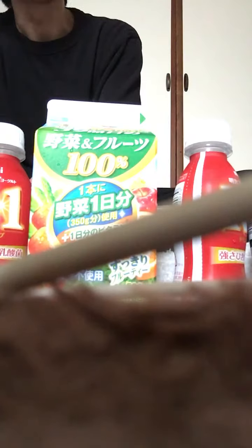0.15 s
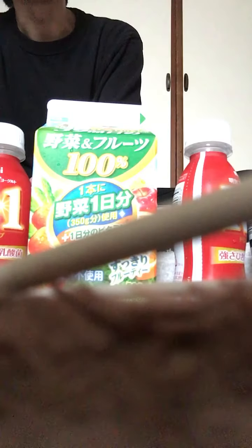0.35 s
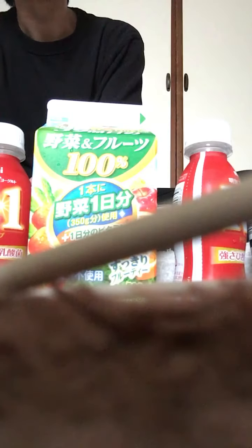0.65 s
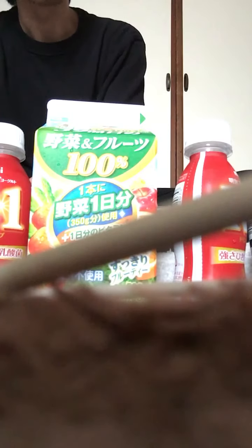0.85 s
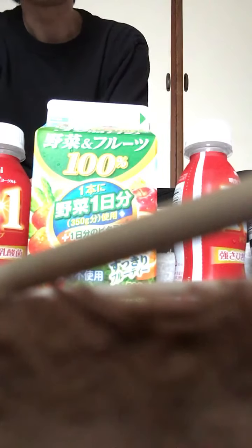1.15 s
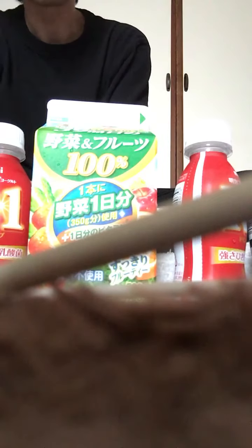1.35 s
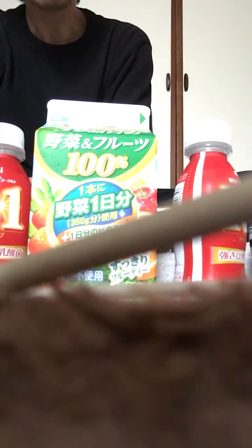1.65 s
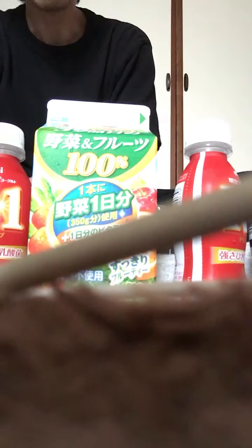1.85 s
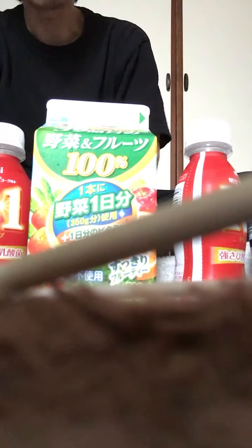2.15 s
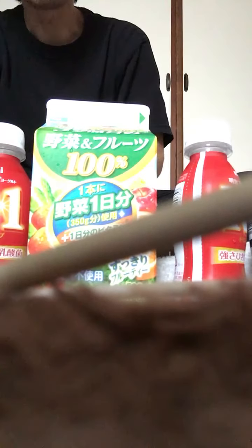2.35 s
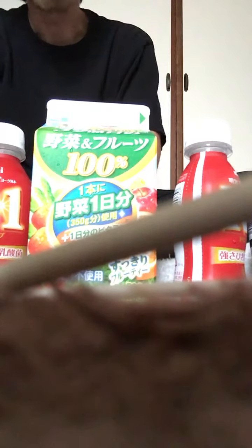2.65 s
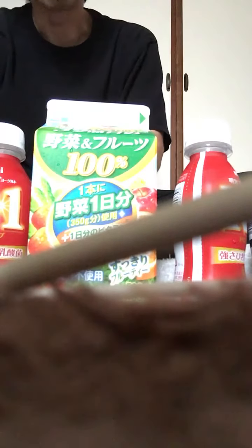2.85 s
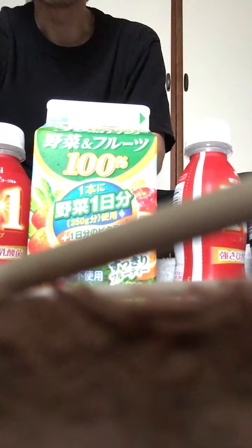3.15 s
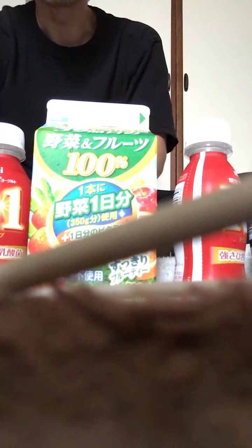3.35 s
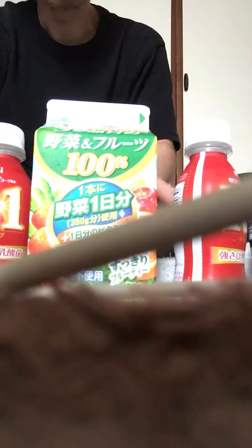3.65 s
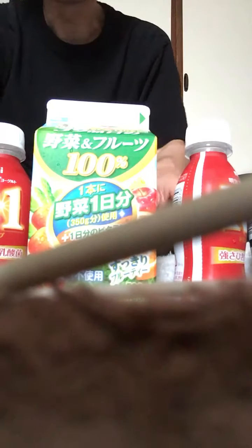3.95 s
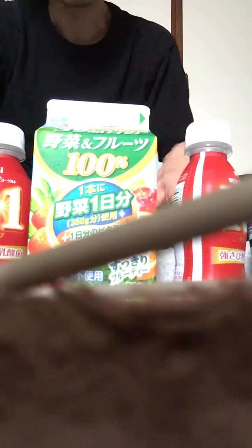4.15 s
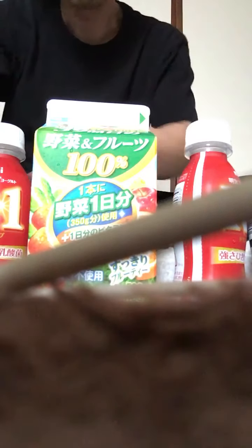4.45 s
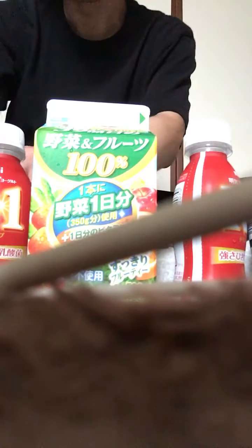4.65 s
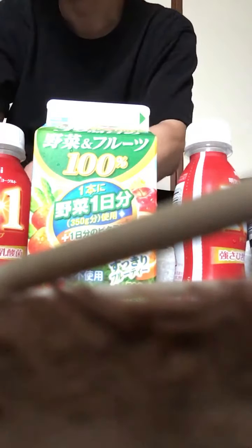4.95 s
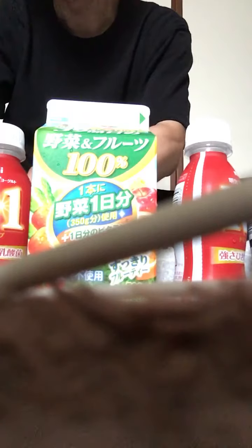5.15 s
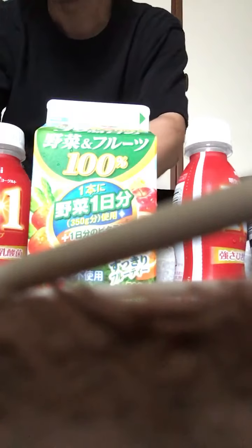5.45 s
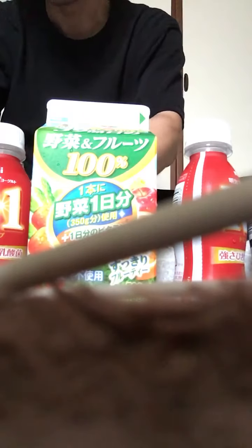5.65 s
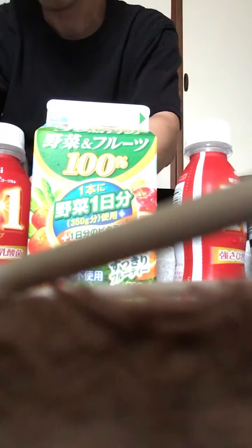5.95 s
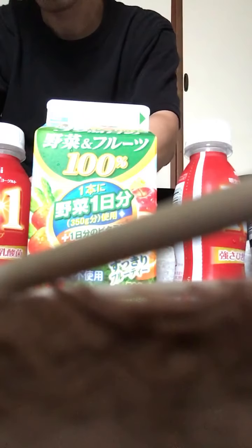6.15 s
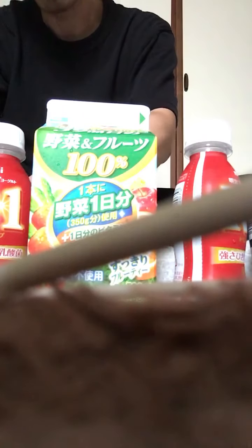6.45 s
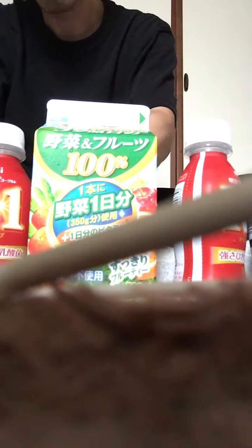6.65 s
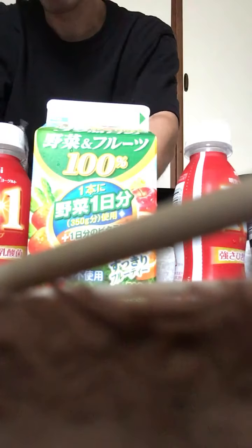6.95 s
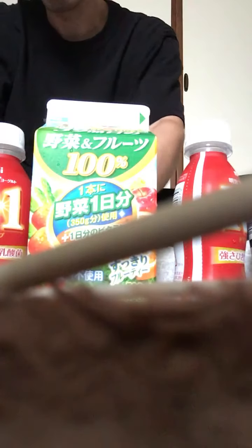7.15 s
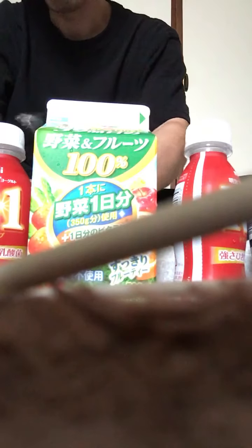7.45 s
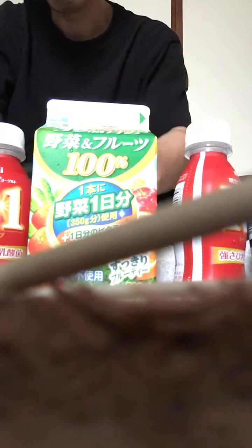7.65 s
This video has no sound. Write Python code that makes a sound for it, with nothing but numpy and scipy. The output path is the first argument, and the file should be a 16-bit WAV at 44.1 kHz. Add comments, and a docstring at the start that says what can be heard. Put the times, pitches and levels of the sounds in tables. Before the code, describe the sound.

A thin plastic takeout container is handled close to the microphone in a small, quiet room. Soft crinkles and dry snaps come first, with one hard crack and tray knock early on. Snaps grow strongest before the middle, the lid creaks briefly and pops free, then lighter rustling and ticks continue, with a few firmer snaps. A faint low hum and still air lie underneath.

```python
"""Hands open a thin plastic takeout container in a small, quiet room, over still air and a faint hum.
From the start a soft crinkle (tiny ringing slips), faint ticks and dry snaps (pulses through resonances) mix.
Strong snaps gather at 0.75 s, with the first tray knock (decaying tones); near 2 s skin squeaks (narrow noise).
Near 3.3 s come the strongest snaps; by 3.5 s the rim creaks (repeated flicks) and then pops free.
Later handling is mostly lighter, with stronger snaps near 5.3 and 7 s; a wall and the room answer most of it."""
import sys
import numpy as np
from scipy import signal
from scipy.fft import rfft, irfft, next_fast_len
from scipy.io import wavfile
from scipy.ndimage import uniform_filter1d, map_coordinates

SR = 44100
rng = np.random.default_rng(int(sys.argv[2]) if len(sys.argv) > 2 else 0)


def generate_wav(sig):
    """Save sig (samples, or channels by samples) to the path in sys.argv[1] as 16-bit PCM at SR."""
    pcm = np.round(np.clip(np.atleast_2d(sig).T, -1, 1) * 32767).astype(np.int16)
    wavfile.write(sys.argv[1], SR, pcm)


N = 344421  # length of the scene [samples]


def amp(db):
    """Turn decibels into an amplitude factor."""
    return 10 ** (np.asarray(db) / 20)


def unit(x):
    """Scale a sound to an average (rms) strength of 1."""
    return x / np.sqrt(np.mean(x ** 2) + 1e-20)


def along(points, hz):
    """Read a (frequency, value) curve at any frequency, on a log frequency axis."""
    point_hz, values = np.transpose(points)
    return np.interp(np.log(hz + 1), np.log(point_hz + 1), values)


def wobble(rate):
    """A smooth random curve with this many new random values a second."""
    knots = rng.standard_normal(int(N * rate / SR) + 4)
    return map_coordinates(knots, [np.arange(N) * rate / SR])


def filtered(x, response):
    """Multiply each frequency of a sound by the gain that response gives it."""
    size = next_fast_len(len(x) + 8192)
    spectrum = rfft(x, size) * response(np.fft.rfftfreq(size, 1 / SR))
    return irfft(spectrum, size)[:len(x)]


def causal(gain):
    """The minimum-phase spectrum with this gain: it rings only after the blow."""
    cepstrum = irfft(np.log(np.maximum(gain, 1e-6)))
    half = len(cepstrum) // 2
    cepstrum[1:half] *= 2
    cepstrum[half + 1:] = 0
    return np.exp(rfft(cepstrum))


def coloured(x, points, size=2048):
    """Shape the tone of a sound with a (frequency, dB) curve, without ringing ahead of it."""
    gain = amp(along(points, np.fft.rfftfreq(size, 1 / SR)))
    return signal.fftconvolve(x, irfft(causal(gain)))[:len(x)]


def add(track, s, sound):
    """Mix a sound into the track at time s [s]."""
    part = track[max(round(s * SR), 0):][:len(sound)]
    part += sound[:len(part)]


# Tone of the still air: (frequency [Hz], relative level per Hz [dB])
AIR_TONE = [(15, -24), (28, -4), (55, -8), (85, 2.5), (110, -4), (160, 1), (350, -1.5), (480, -6),
            (1070, -10), (1840, -18.5), (2400, -20), (4900, -32.5), (13200, -44.5), (16000, -44)]
# The low hum swells and sinks: (time [s], level [dB])
HUM_LEVEL = [(0, -73), (3.5, -70), (4.3, -71.5), (5.15, -65), (5.4, -71), (5.8, -62.5), (6.15, -68.5),
             (7.0, -70), (7.3, -67), (7.8, -71)]


def background(air_db=-62, hum_hz=59, waver_db=2, drift_rad=0.26):
    """Still air is shaped noise; the hum is one low tone whose strength and phase waver."""
    t = np.arange(N) / SR
    air = unit(filtered(rng.standard_normal(N), lambda hz: amp(along(AIR_TONE, hz))))
    tone = np.sin(2 * np.pi * hum_hz * t + drift_rad * wobble(2.3))
    hum = unit(tone * amp(waver_db * wobble(1.987)))
    hum_gain = amp(np.interp(t, *np.transpose(HUM_LEVEL)))
    return amp(air_db) * air + hum_gain * hum


# The hands never rest, a faint rustle of the grip: (time [s], level before the rustle trim [dB])
GRIP_LEVEL = [(0, -67.5), (.3, -72), (.7, -72), (.9, -63), (1.11, -72.5), (1.3, -64), (1.85, -62.5),
              (2.2, -63), (2.55, -73), (3.05, -74), (3.7, -61), (4.05, -70), (4.95, -69), (5.25, -66.5),
              (5.55, -72), (6.15, -72), (6.9, -63), (7.8, -63)]
GRIP_FIZZ_DB = -11.5  # fizz curve of the grip relative to its rustle curve
# Fingers slide along the rim, levels before the crinkle trims:
# (middle time [s], length [s], rustle of the panels [dB], fizz of the sliding [dB])
RIM_SLIDES = [(.12, .12, -64, -70.5), (0.423, .08, -63, -83.5), (1.021, .1, -57, -69),
              (1.217, .1, -53.5, -59.5), (1.375, .12, -59, -63), (1.483, .11, -58, -63.5),
              (1.725, .09, -48, -64), (1.987, .14, -57, -59), (2.055, .09, -46, -51.5),
              (2.128, .15, -52, -78), (2.393, .12, -47, -60), (2.75, .24, -56.5, -65),
              (3.112, .08, -57, -65), (3.506, .08, -50, -78), (3.627, .1, -57, -62), (3.874, .14, -53, -78),
              (4.313, .1, -66, -66.5), (4.705, .2, -61, -61), (4.847, .11, -58, -56.5),
              (5.129, .2, -68, -72), (5.31, .12, -55, -66), (5.79, .16, -59, -67.5), (6.04, .06, -62, -74),
              (6.234, .11, -64, -65.5), (6.459, .28, -60, -65), (6.638, .13, -60.5, -61),
              (6.747, .06, -57, -57), (6.96, .2, -57, -57), (7.05, .08, -47, -53), (7.114, .07, -52, -71),
              (7.489, .24, -58, -61.5), (7.773, .16, -61.5, -63)]
# A panel gives way and crumples in a short burst, levels before the crinkle trims:
# (time [s], rustle of the panels [dB], fizz of the sliding [dB])
PANEL_CRUMPLES = [(.168, -56, -71), (.75, -33.5, -61), (1.305, -49, -64), (1.683, -39, -54),
                  (2.888, -49, -72), (3.19, -46, -67), (3.29, -41, -72), (5.27, -55, -67), (5.32, -49, -78),
                  (6.292, -55, -59), (6.807, -54, -52), (7.03, -42, -57)]
CRUMPLE_ATTACK_S, CRUMPLE_FADE_DB_PER_S = .004, 210


def handling():
    """The powers of grip, slides and crumples add up to two amplitude curves: rustle and fizz."""
    t = np.arange(N) / SR
    grip_db = np.interp(t, *np.transpose(GRIP_LEVEL))
    power = amp(grip_db + np.array([[0], [GRIP_FIZZ_DB]])) ** 2
    age = np.arange(SR // 2) / SR
    burst = (1 - np.exp(-age / CRUMPLE_ATTACK_S)) * amp(-CRUMPLE_FADE_DB_PER_S * age)
    moves = []
    for middle, length, *levels in RIM_SLIDES:
        swell = np.sin(np.pi * np.arange(0, 1, 1 / (length * SR)))
        moves.append((middle - length / 2, swell, levels))
    moves += [(s, burst, levels) for s, *levels in PANEL_CRUMPLES]
    for s, shape, levels in moves:
        for track, db in zip(power, levels):
            add(track, s, (amp(db) * shape) ** 2)
    return np.sqrt(power)


def grains(rate, centre_hz, octaves, life_s, spread_db, size=400):
    """Tiny slips, rate a second, their strength spread set by spread_db; each rings briefly at its own pitch."""
    count, t = int(rate * N / SR), np.arange(size) / SR
    start, phase = rng.random((count, 2)).T[:, :, None]
    pitch, life, strength = np.clip(rng.standard_normal((count, 3)), -2, 2).T[:, :, None]
    hz = np.minimum(centre_hz * 2 ** (octaves * pitch), SR / 2)
    age = t / (life_s * 2 ** (life / 2))
    envelope = amp(spread_db * strength) * age * np.exp(-age)
    ring = envelope * np.sin(2 * np.pi * (hz * t + phase))
    places = (start * N).astype(int) + np.arange(size)
    return unit(np.bincount(places.ravel(), ring.ravel(), N)[:N])


# Tone of the rubbed panels: (frequency [Hz], relative gain [dB])
PANEL_TONE = [(60, -42), (200, -3), (470, -3.5), (600, 0), (780, -2.5), (1050, 0.5), (1900, -3),
              (3200, -5.5), (4300, -6.5), (5500, -44), (12000, -15)]
# Tone of the sliding contact: (frequency [Hz], relative gain [dB])
FIZZ_TONE = [(1200, -55), (3500, 9), (5000, 2.5), (6500, -.5), (9000, 1), (10400, -3.5), (12500, 1.5),
             (16000, -1.5)]


def crinkle(rustling, fizzing, panel_db=-.5, fizz_db=-5.0, flutter_db=3, catch_db=2.5):
    """Clumps of slips rustle the panels and fizz at the contact, where the skin catches."""
    clumps = amp(flutter_db * wobble(110))
    rustle = grains(rate=1400, centre_hz=1498, octaves=0.907, life_s=0.00039, spread_db=3, size=200)
    fizz = grains(rate=1300, centre_hz=8400, octaves=0.8, life_s=.0001, spread_db=0.0, size=60)
    catches = amp(catch_db * wobble(80))
    panels = unit(coloured(rustle * clumps, PANEL_TONE))
    contact = unit(coloured(fizz * clumps * catches, FIZZ_TONE))
    return amp(panel_db) * rustling * panels + amp(fizz_db) * fizzing * contact


def snap(crack_db, edge_db, main_hz, main_db, ripple_db, mode_gap_hz, travel_s, ring_db, ring_s, size=2048):
    """A panel flips: one pulse through resonances that shift with every bend of the sheet."""
    hz, t = np.fft.rfftfreq(size, 1 / SR), np.arange(size) / SR
    # overall tone: (frequency [Hz], gain [dB])
    shape = [(40, -27.0), (150, -10.5), (380, -9.5), (600, 1), (1100, 0),
             (1600, crack_db / 2), (2400, crack_db - 3.5), (3700, crack_db - 7),
             (5200, 0.87 * edge_db + 0.24 * crack_db - 0.5), (8000, edge_db - 3.0),
             (10400, edge_db - 6), (12500, edge_db - 4.5), (16000, edge_db - 10.5)]
    main = main_db * (1 / (1 + ((hz - main_hz) / (0.11 * main_hz)) ** 2) - .35)
    ripple = map_coordinates(rng.standard_normal(size // 4), [hz / mode_gap_hz], mode="mirror")
    modes = amp(ripple_db * ripple)
    # waves bounce between the rims for a few milliseconds
    bounces = rng.standard_normal(size) * np.exp(-t / ring_s) * (1 - np.exp(-2 * t / ring_s))
    sheet = causal(modes) * (1 + amp(ring_db) * rfft(bounces / np.linalg.norm(bounces)))
    # even out the broad tone, keeping the fine resonances
    sheet /= np.sqrt(uniform_filter1d(np.abs(sheet) ** 2, size=40))
    # bending waves carry the treble faster than the bass, so the snap chirps downward;
    # travel_s is the delay at 1 kHz
    chirp = np.exp(-4j * np.pi * travel_s * np.sqrt(hz * 10 ** 3))
    return irfft(sheet * chirp * causal(amp(along(shape, hz) + main)))


TICK_CROWDING = .5  # how strongly the ticks gather where the sheet is worked
TICK_DULLING = 0.13  # harder work bends wider creases: edge setting lost [dB] per dB of effort
TICK_RESONANCE_DB = 11


def ticks(rustling, level_db=-27, spread_db=7, follow=0.43, most_effort_db=22,
          crack_db=-1, edge_db=-13, tone_db=7, centre_hz=1800, count=380):
    """Creases give way in faint, sharp ticks, denser and stronger where the sheet is being worked."""
    effort_db = np.minimum(20 * np.log10(rustling / np.median(rustling)), most_effort_db)
    strain = np.cumsum(amp(TICK_CROWDING * effort_db))
    out = np.zeros(N)
    for i, (place, size, crack, edge, pitch) in enumerate(2 * rng.random((count, 5)) - 1):
        # equal steps of strain put more ticks where the work is hard
        at = np.searchsorted(strain, strain[-1] * (i + 1 + place) / (count + 1))
        tick_edge_db = edge_db + tone_db * edge - TICK_DULLING * effort_db[at]
        tick = snap(crack_db + tone_db * crack / 2, tick_edge_db, centre_hz * 2 ** pitch,
                    main_db=TICK_RESONANCE_DB, ripple_db=2.5, mode_gap_hz=600, travel_s=0.000389,
                    ring_db=1, ring_s=0.0017, size=1024)
        add(out, at / SR, amp(level_db + follow * effort_db[at] + spread_db * size) * tick)
    return out


# How long the room rings: (frequency [Hz], time to fall by 60 dB [s])
ROOM_RING = [(150, .25), (500, .25), (1100, .29), (3000, .36), (8000, .42), (15000, .33)]
# Strength of the room's tail before its build-up: (frequency [Hz], level against the direct sound [dB])
ROOM_LEVEL = [(150, -10), (500, -11), (1100, -11), (3000, -10), (6000, -5.5), (12000, -2)]
# The wall hears the bright side of the container: (frequency [Hz], level against the direct sound [dB])
WALL_LEVEL = [(300, -22), (1500, -19), (4000, -15), (7000, -6), (13000, 0)]


def room(wall_s=0.0083, wall_spread_s=0.0024, build_s=0.007, size=16384):
    """One path through the room: the direct sound, a scattered wall echo, then the diffuse tail."""
    t = np.arange(size) / SR
    hz, frames, noise = signal.stft(rng.standard_normal(size), SR, nperseg=256)
    decay = amp(-60 * frames / along(ROOM_RING, hz)[:, None])
    strength = np.sqrt(np.mean(decay ** 2, axis=1, keepdims=True) * size)
    decay *= amp(along(ROOM_LEVEL, hz))[:, None] / strength
    tail = signal.istft(noise * decay, SR, nperseg=256)[1][:size]
    tail = tail * (1 - np.exp(-(t / build_s) ** 2))
    scatter = rng.standard_normal(size) * (t > wall_s) * np.exp(-np.abs(t - wall_s) / wall_spread_s)
    direct = (t == 0)
    return direct + tail + coloured(scatter / np.linalg.norm(scatter), WALL_LEVEL)


def room_in_pieces(x, count=14):
    """Cut a sound into equal pieces, each with its own random room tail, so no one tail colours it all."""
    out, at = np.zeros(N), 0
    for piece in np.array_split(x, count):
        add(out, at / SR, signal.fftconvolve(piece, room()))
        at += len(piece)
    return out


# The clearest buckling snaps: (time [s], strength [dB], crack setting for about 3 kHz [dB],
# edge setting for above 5 kHz [dB], main resonance [Hz])
BUCKLING_SNAPS = [(.0408, -16, -12.5, -19, 1080), (.0528, -11.5, -3, -19, 1206), (.0839, -7, -2.5, -9, 788),
                  (.136, -8.5, -9, -18, 1180), (.1679, -1, -4, -17, 710), (.1837, -7, -11.5, -37, 1710),
                  (.2042, -5.5, -8, -18, 1210), (.2289, -12.5, -3, -38, 928), (.279, -9, -5, -23, 1090),
                  (.3997, -10.5, -5, -25, 825), (.4574, -10.5, -7.5, -22, 1113),
                  (.547, -11, -6.5, -16.5, 1840), (.5704, -9.5, -8, -26, 1840),
                  (.6192, -14.5, -9, -43, 1750), (.6801, -19, -6, -27, 1030), (.7436, 12, -9.5, -22.5, 890),
                  (.7545, 5, -1.5, -14, 902), (.762, 1, 5.5, -39, 1017), (.7695, -2, 4, -39, 2510),
                  (.7748, -1, -20, -24, 936), (.7925, -16, -7, -17, 1210), (.9309, -12.5, -7, -42, 1080),
                  (1.0056, -11.5, -25, -41, 600), (1.0301, -7, -14, -52, 1550), (1.0604, -7, -17, -48, 900),
                  (1.157, -12, -2, -24, 1474), (1.1928, -13, 0, -24, 1577), (1.2348, -2.5, -5, -40, 1250),
                  (1.3052, -3, -2.5, -21.5, 1060), (1.3104, -3.5, -6, -44, 1050),
                  (1.383, -16, 3, -32, 1360), (1.5112, -20, 8.5, -37, 1651), (1.576, -15, 2, -15.5, 1735),
                  (1.5798, -11, 3, -36, 1646), (1.6344, -22, 1, -20, 3080), (1.6691, 4, -12, -27, 1103),
                  (1.6822, 7, -5.5, -22.5, 1110), (1.9903, -26.5, 15, -25, 2780),
                  (2.0549, -6, -11, -18, 1140), (2.129, -5.5, -25, -44, 1187),
                  (2.142, -3.5, -3.5, -44, 1834), (2.1885, 6.5, -5.5, -28, 1610),
                  (2.2949, -18, -1, -14, 1120), (2.3845, -2.5, -10, -26, 1004),
                  (2.4776, -9.5, -10, -22, 1162), (2.7704, -14.5, -8, -16, 1583),
                  (2.8328, -8, -8.5, -22, 1250), (2.881, -15, 1, -13, 1853),
                  (2.8902, -11.5, 4, -12.5, 1310), (2.9196, -5.5, -7, -22, 820),
                  (3.094, 1.5, -5.5, -30, 1014), (3.1858, 2, -7.5, -26, 1812), (3.1945, 4, -5.5, -30, 1805),
                  (3.2052, -2.5, -7, -25, 837), (3.2174, -5, -1, -41, 1820), (3.2416, -1.5, -4, -25, 1103),
                  (3.2818, 15, -4, -30.5, 1080), (3.2999, 10, 1, -26.5, 1100), (3.3111, 11, -16, -51, 1710),
                  (3.3144, 3.5, -25, -47, 870), (3.325, -16, -23, -38, 1090), (3.3993, -2, -6.5, -20, 1940),
                  (3.5446, 8.5, -4, -28, 1120), (3.549, 10.5, -4.5, -31, 1190), (3.558, 0.5, -11, -41, 970),
                  (3.6163, -20, -12, -21, 1120), (3.7013, -11.5, -21, -31, 1010),
                  (3.8194, -7.5, -7, -20, 2730), (3.8326, -10, -10, -18, 624), (3.8808, -18, 6.5, -1, 2460),
                  (4.06, -21, -1, -14, 751), (4.0243, -24, -3, -8, 1140), (4.1557, -29, 3, -18, 3010),
                  (4.2895, -12.5, -9, -18, 900), (4.3981, -19.5, -5, -26, 1795),
                  (4.4285, -17, -15, -20, 838), (4.4584, -17, -9, -15, 1830), (4.5492, -33, 4, 3.5, 4170),
                  (4.6802, -8.5, -20, -22, 1660), (4.7671, -16, -0.5, -10, 977),
                  (4.864, -11, -1, -30, 2370), (4.98, -17.5, -4, -30, 1518), (5.0048, -13, -3, -16.5, 1040),
                  (5.0647, -24, -4, -10, 1777), (5.1046, -24, 7, -9, 2090), (5.1736, -19, 2, -18, 1815),
                  (5.2731, -7, -6.5, -22, 1134), (5.322, 0, -13, -41, 1054), (6.0423, -18, -3, -15, 1990),
                  (6.2926, -9, -8, -21, 1136), (6.4123, -22, 1, -11, 3356), (6.4645, -20, 2, -16, 1480),
                  (6.5357, -25, 13.5, -13, 1802), (6.6603, -21.5, 5, -12, 1640), (6.8064, -7, 0, -14, 1120),
                  (7.0279, 0.5, 1.5, -14, 1270), (7.0307, -9, 8.5, -13, 2506), (7.0582, -7, 4.5, -9, 3480),
                  (7.13, -14, 5, -14, 1230), (7.213, -16.5, -3, -22, 2700), (7.2444, -16.5, 1, -17, 1730),
                  (7.3854, -5.5, -14, -31, 1064), (7.4061, -8, -5.5, -21, 945), (7.4748, -7, -19, -31, 710),
                  (7.595, -6, -7.5, -25, 1210), (7.6562, -28, 10, 0.5, 3474),
                  (7.7104, -27.5, 14, 0.5, 4530), (7.7632, -15, 1.5, -16, 721)]
# Each snap is blurred by faint copies, one just before it and two after:
# (earliest time from the snap [s], latest time from the snap [s], level before random spread [dB])
FAINT_COPIES = [(-.005, -0.001, -22.5), (.002, .007, -11), (.007, 0.03, -15)]


def snaps(ring_db=-4, ring_s=0.0018, main_db=7, ripple_db=2.5, copy_spread_db=3, count=16):
    """Each flipping panel snaps, blurred by faint copies; the snaps take turns on several room paths."""
    out = np.zeros(N)
    paths = [room() for _ in range(count)]
    lead_s = .01  # room for the faint copy ahead of the snap
    for i, (s, db, crack_db, edge_db, main_hz) in enumerate(BUCKLING_SNAPS):
        # the copies share the snap's settings but have their own random resonances
        click, faint = (snap(crack_db, edge_db, main_hz, main_db, ripple_db, mode_gap_hz=384,
                             travel_s=0.000713, ring_db=ring_db, ring_s=ring_s, size=1024)
                        for _ in range(2))
        blurred = np.zeros(SR // 16)
        add(blurred, lead_s, click)
        for earliest, latest, copy_db in FAINT_COPIES:
            copy_s = lead_s + earliest + (latest - earliest) * rng.random()
            level_db = copy_db + copy_spread_db * (2 * rng.random() - 1.5)
            add(blurred, copy_s, amp(level_db) * faint)
        # start a touch early, as the chirp arrives late
        add(out, s - lead_s - .0003, amp(db) * signal.fftconvolve(blurred, paths[i % count]))
    return out


# The tray knocks on the table: (time [s], level before the trim in knocks() [dB])
TRAY_KNOCKS = [(0.742, -31), (2.183, -45.5), (3.28, -45), (3.309, -50), (3.544, -25.5), (5.32, -40),
               (7.025, -41.5), (7.525, -49)]
# Tray and table ring together: (frequency [Hz], typical level [dB], time to fall by 60 dB [s])
TRAY_MODES = [(84.5, -10, 0.17), (137.3, -6, 0.25), (186.94, 1.5, 0.089), (217, -5, 0.11),
              (256, -0.5, 0.13), (364, 4.5, 0.062), (435, 5, 0.089), (523, 1, 0.049), (628, 1, 0.12),
              (710, -24, .1), (870, 1, 0.077), (1030, 0, 0.17), (1093, 1, 0.1)]


def knocks(level_db=-11, attack_s=0.00058):
    """Every knock rings the tray and the table as fading tones, at new strengths each time."""
    out, t = np.zeros(N), np.arange(SR // 3) / SR
    hz, mode_db, t60 = np.transpose(TRAY_MODES)[:, :, None]
    for s, db in TRAY_KNOCKS:
        fade = amp(mode_db + 2 * rng.standard_normal(hz.shape) - 60 * t / t60)
        ring = fade * np.sin(2 * np.pi * (hz * t + rng.random(hz.shape)))
        add(out, s, amp(db + level_db) * ring.sum(0) * (1 - np.exp(-t / attack_s)))
    return out


# A fingertip squeaks on the plastic: (start time [s], length [s], frequency [Hz], level before the swell [dB])
SKIN_SQUEAK = (2.022, .036, 13200, -52)


def squeak(width_hz=900):
    """Skin dragging on the sheet gives a brief, thin whistle: narrow noise that swells and fades."""
    s, length, centre_hz, db = SKIN_SQUEAK
    swell = np.sin(np.pi * np.clip((np.arange(N) / SR - s) / length, 0, 1))
    whistle = filtered(rng.standard_normal(N), lambda hz: 1 / (1 + ((hz - centre_hz) / width_hz) ** 2))
    return amp(db) * swell * unit(whistle)


# The lid creaks over the rim just before it pops free:
# (time [s], slips a second before jitter [1/s], level before the boost in creak() [dB])
RIM_CREAK = [(3.458, 210, -89), (3.465, 260, -49), (3.49, 400, -49), (3.51, 330, -50), (3.53, 450, -69)]


def creak(level_db=20, jitter=0.11):
    """The rim sticks and slips at an uneven, mostly rising rate, each slip flicking the same panel."""
    s, rate, db = np.transpose(RIM_CREAK)
    t = np.arange(N) / SR
    turns = np.cumsum(np.interp(t, s, rate) * (1 + jitter * wobble(200))) / SR
    strength = amp(np.interp(t, s, db, left=-120, right=-120) + level_db)
    slips = np.diff(np.floor(turns), prepend=0) * strength  # one pulse at each whole turn
    flick = snap(-6.0, -20.0, 1080, main_db=9.0, ripple_db=0, mode_gap_hz=335,
                 travel_s=0.000556, ring_db=2, ring_s=0.0022)
    flick_in_room = signal.fftconvolve(flick / np.linalg.norm(flick), room())
    return signal.fftconvolve(slips, flick_in_room)[:N]


def scene():
    """Everything at one microphone."""
    rustling, fizzing = handling()
    rubbing = room_in_pieces(ticks(rustling) + crinkle(rustling, fizzing))
    return (background() + rubbing + snaps() + knocks() + squeak() + creak())[None]


def record(dry, top_hz=16050, steepness=120):
    """A steep filter takes away the treble above the band limit."""
    return filtered(dry[0], lambda hz: 1 / (1 + (hz / top_hz) ** steepness))[None]


dry = scene()
out = record(dry)
generate_wav(out)
```